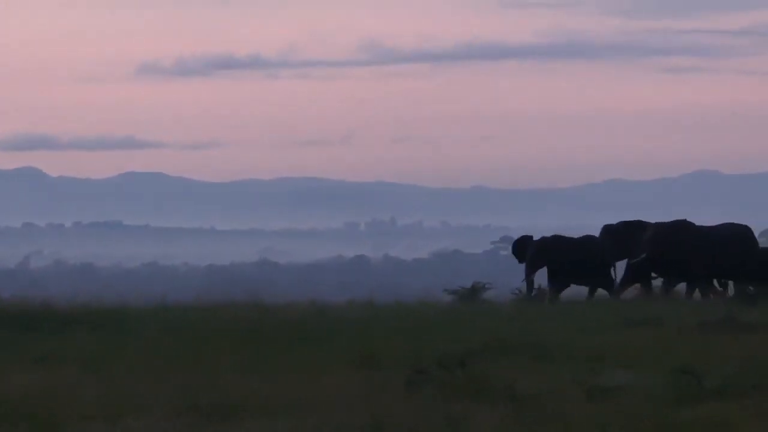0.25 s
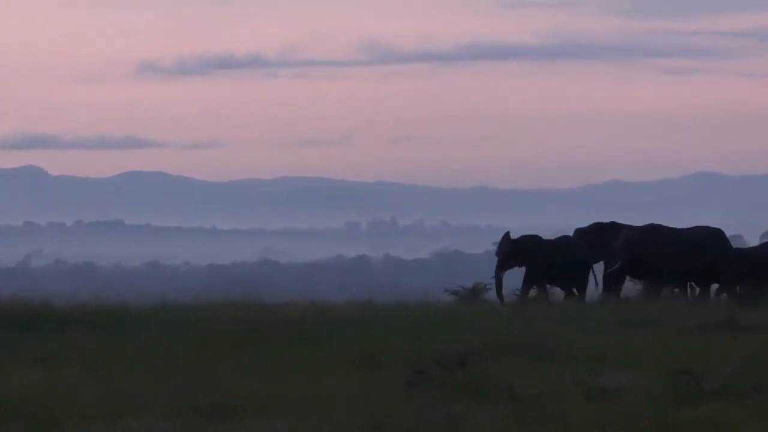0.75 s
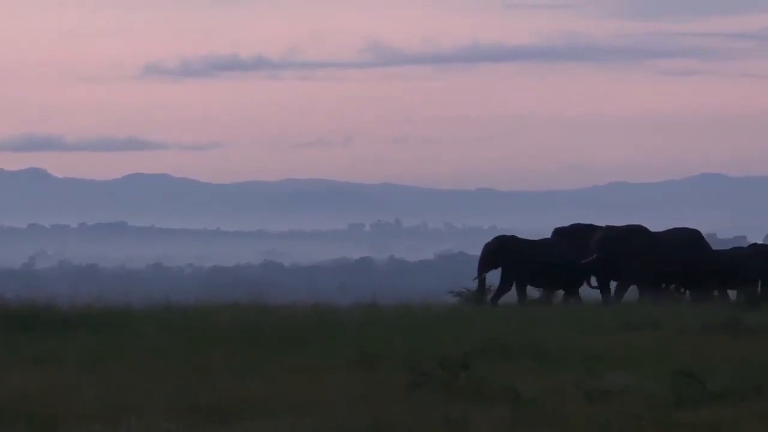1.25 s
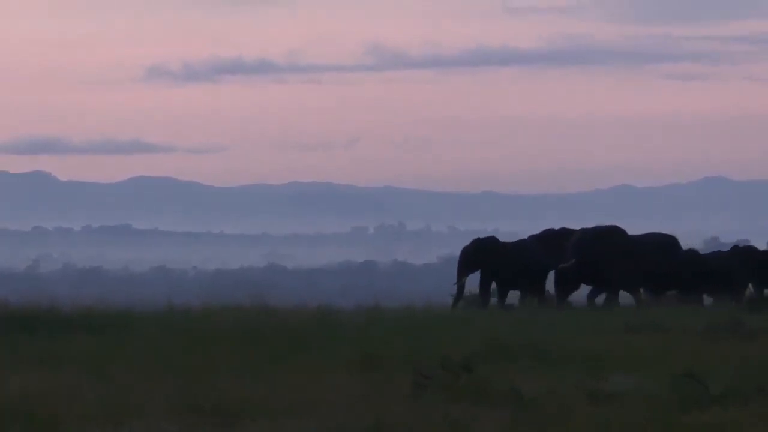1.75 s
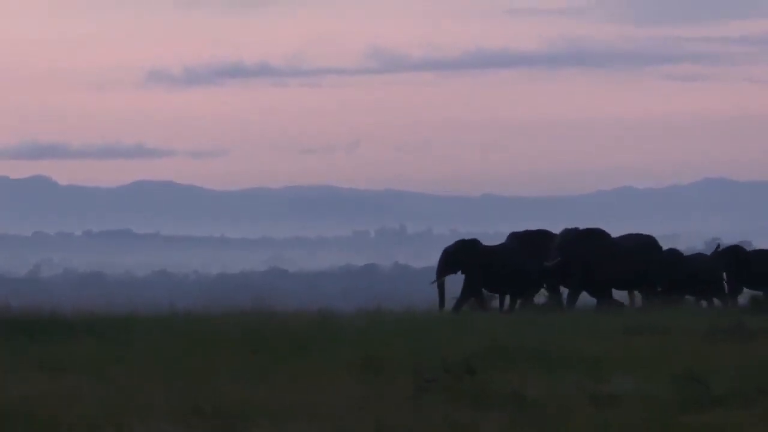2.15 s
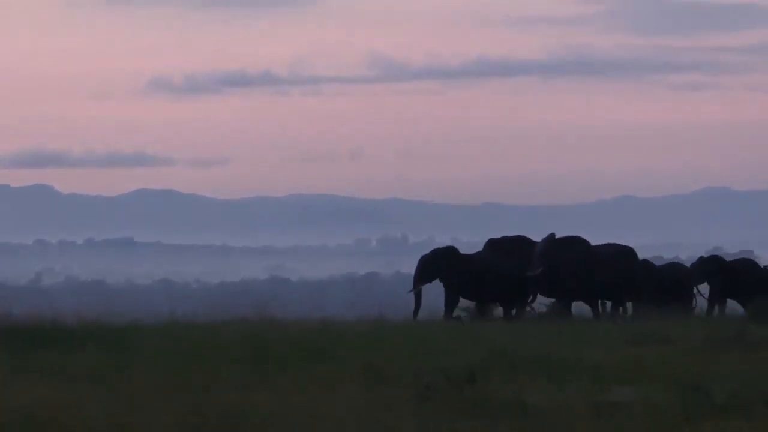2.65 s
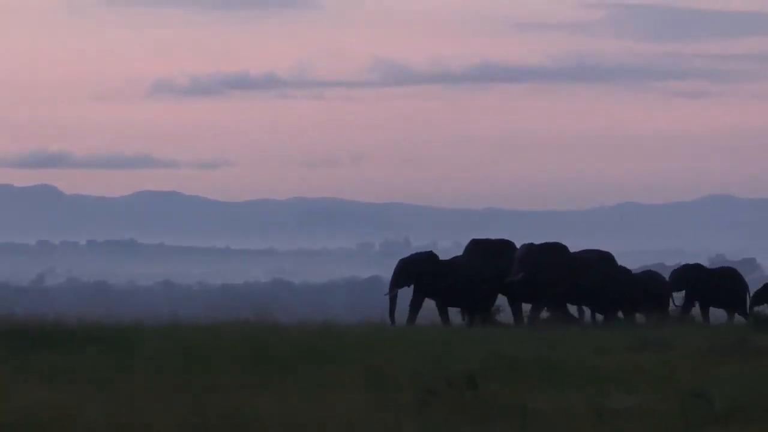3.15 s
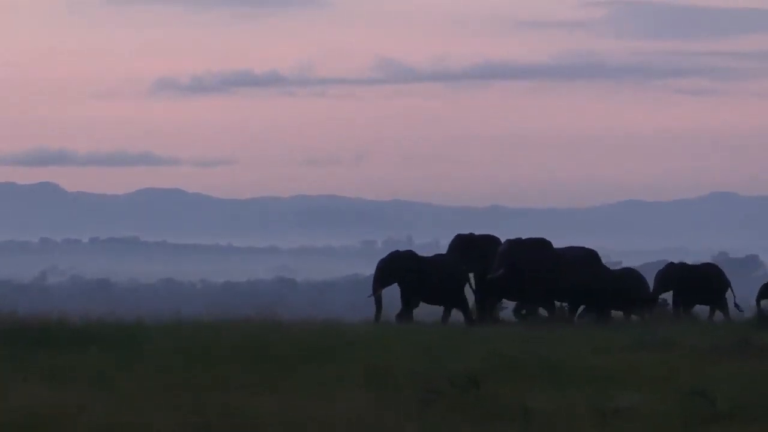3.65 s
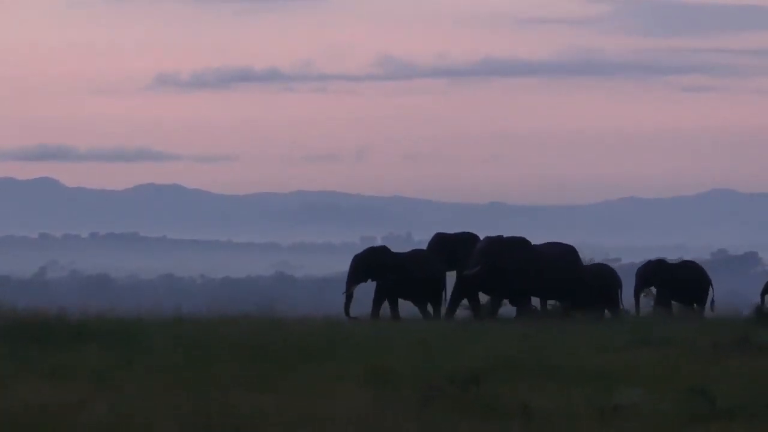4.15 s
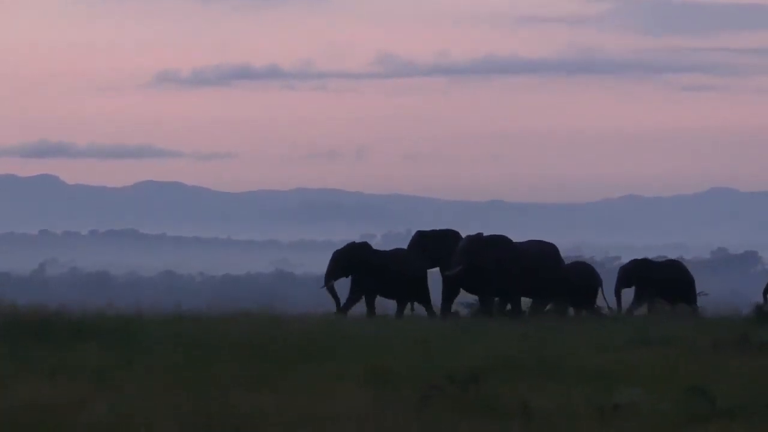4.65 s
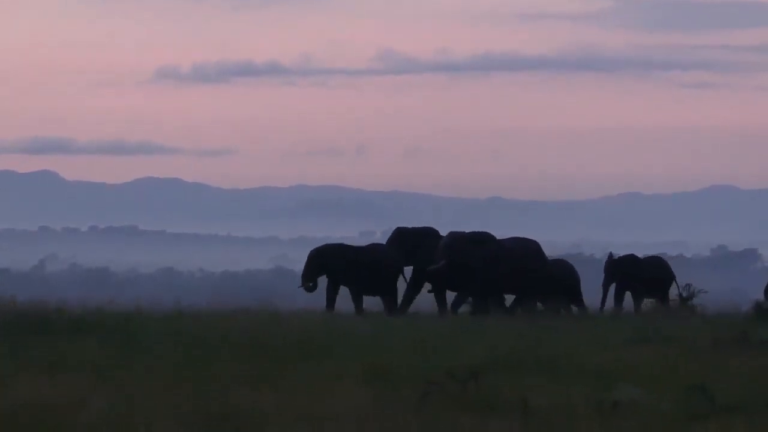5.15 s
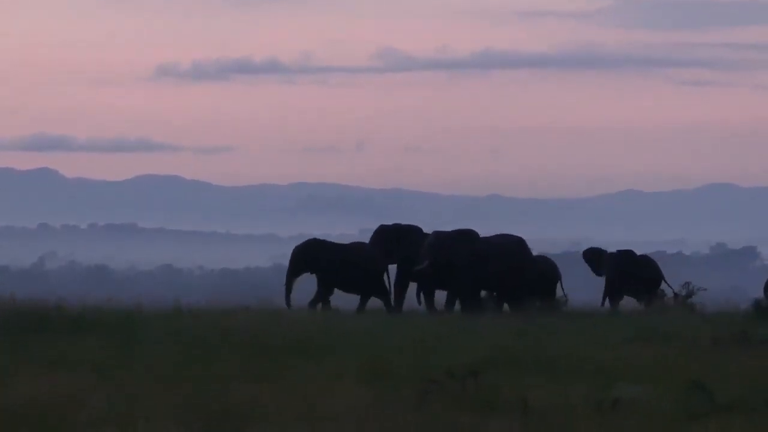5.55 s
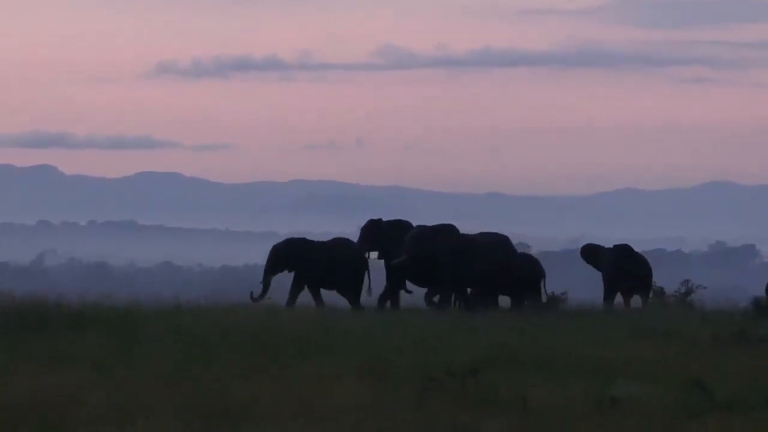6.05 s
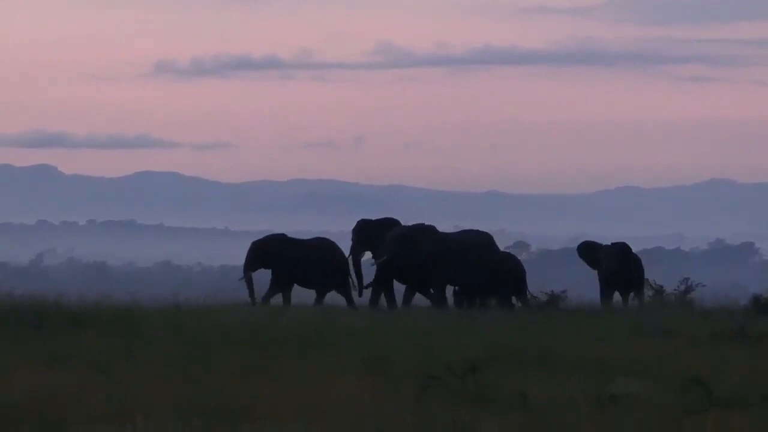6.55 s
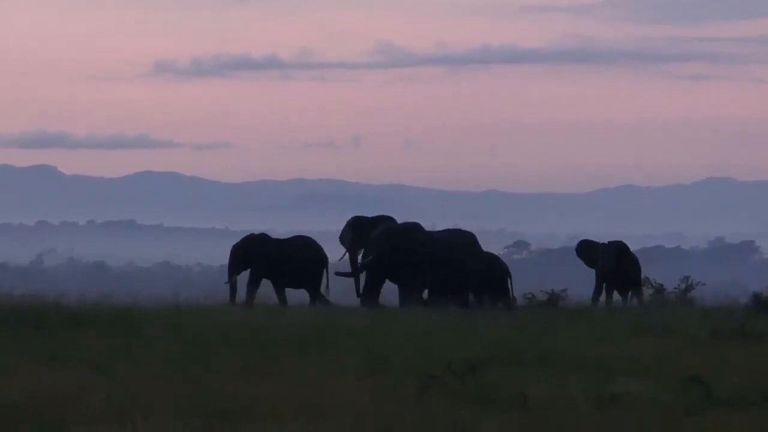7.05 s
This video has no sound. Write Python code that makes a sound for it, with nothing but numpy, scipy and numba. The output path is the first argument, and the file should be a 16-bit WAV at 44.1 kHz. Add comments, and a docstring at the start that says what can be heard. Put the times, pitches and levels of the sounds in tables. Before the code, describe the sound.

Outdoor stereo ambience on a wide plain: faint airy hiss, dense far-off birdsong and low wind buffeting on the microphone. After an opening two-note bird whistle and faint insect chirps, one elephant roars for just over a second, rough and throaty, swelling into a hoarse blare before dropping off. Quiet birds continue, grass hisses, wind bumps harder, the whistle returns, and a dry scrape with ticks sounds close by.

```python
"""Elephant roar across open grassland

An elephant, off to the right, gives one rough roar: a sputtering growl that opens into a blare and sinks.
Irregular vocal-fold pulses and gated breath drive resonances of the mouth and trunk.
A near bird twice whistles a falling note and a level one, as gliding sines; farther birds, a frog and
insects are bent sines, pulsed pips and noise. Breeze thumps on the microphone as short pressure swings;
hissing grass, a faint rumble, and one close scrape with two ticks are shaped from noise."""
import sys
import numpy as np
from scipy import signal
from scipy.fft import rfft, irfft
from scipy.io import wavfile
from scipy.ndimage import uniform_filter1d
from numba import njit

SR = 44100
rng = np.random.default_rng(int(sys.argv[2]) if len(sys.argv) > 2 else 0)


def generate_wav(signal):
    """Clip the signal to [-1, 1] and save it as 16-bit WAV at the path in sys.argv[1]."""
    frames = np.transpose(np.atleast_2d(signal))
    scaled = np.clip(frames, -1, 1) * 32767
    pcm = np.round(scaled).astype(np.int16)
    wavfile.write(sys.argv[1], SR, pcm)


N = 321489
T = np.arange(N) / SR  # time [s]
F = np.maximum(np.arange(N // 2 + 1) * SR / N, 1)  # spectrum bins [Hz]
TOP_HZ = 15600

# the plain's air: (frequency [Hz], relative level [dB])
PLAIN_COLOUR = [(25, -5), (76, -12.5), (250, 0.5), (370, -3), (480, 3), (680, -5.5), (1000, -3), (1300, -6),
                (2200, -5), (2700, -9), (3200, -12.5), (3900, -14.5), (7000, -26.5)]
PLAIN_DB = -55
# hiss of the grass: (frequency [Hz], relative level [dB])
GRASS_COLOUR = [(1500, -35), (3000, 3), (6000, 1.5), (7500, -2.5), (9300, 1.5), (12000, -3.5), (15500, -4)]
# swells of the grass: (time of the height [s], half length [s], level before the grass gain [dB])
GRASS_SWELLS = [(4.15, 0.29, -60), (4.85, 0.43, -60.5), (5.45, 0.15, -59), (6.35, 0.19, -65.5)]
STILL_GRASS_DB = -65.5  # between swells, before the grass gain
# a faint low rumble: (time of the height [s], half length [s], level [dB])
RUMBLE_SWELL = [(3.25, 0.13, -51)]
# its outline: (frequency [Hz], relative level [dB])
RUMBLE_COLOUR = [(120, -6), (155, 3), (235, -2.5), (320, -6), (450, -11)]

# puffs on the microphone: (time [s], peak [dB], frequency [Hz])
PUFFS = [(0.061,-27,304),(0.194,-28,164),(0.52,-29,129),(0.884,-39,118),(1.173,-37,123),(1.752,-30,104),(1.943,-27,122),(2.065,-30,123),(3.758,-34,130),
         (3.92,-35,226),(3.936,-31,151),(3.975,-28,136),(4.099,-23.5,140),(4.206,-34,190),(4.277,-31,188),(4.299,-34,120),(4.336,-21.5,162),(4.36,-22,224),(4.409,-24,164),(4.428,-25,172),
         (4.529,-13,272),(4.534,-21,247),(6.446,-34.5,96),(6.640,-33,123),(6.663,-32.5,108),(7.1,-27.5,157),(7.151,-33.5,145),(7.202,-38,136)]
# gusts that flutter on it: (time of the height [s], half length [s], level before the flutter gain [dB])
GUSTS = [(.2, 0.32, -48), (1.97, 0.24, -40.5), (3.98, 0.057, -40), (4.26, 0.22, -41.5), (4.47, 0.089, -36),
         (4.9, 0.16, -54), (6.56, 0.29, -48.5), (7.19, 0.11, -43.5)]
CALM_DB = -62.5  # the flutter between gusts, before the flutter gain

# distant chorus: (time [s], level of a call before distance smears it [dB])
CHORUS_LEVEL = [(0, -55.5), (1.1, -62), (2.8, -60.5), (4.0, -66), (5.2, -60), (5.8, -57.5), (7.29, -59.5)]
# short calls and pips, among them faint echoes of the near bird's whistle:
# (time [s], length [s], start [Hz], middle [Hz], end [Hz], level [dB])
SHORT_CALLS = [(0, 0.058, 3720, 3380, 2640, -56), (0.093, 0.031, 2580, 2730, 2790, -49),
               (0.345, 0.086, 3850, 4020, 3920, -62), (0.484, 0.075, 1497, 1606, 1480, -61.5),
               (0.836, 0.043, 2750, 2530, 2510, -56), (1.108, 0.11, 2690, 2860, 2940, -62),
               (1.36, 0.018, 3700, 4150, 4300, -50.5), (1.909, 0.015, 3850, 4220, 4330, -49),
               (2.142, 0.018, 3880, 4270, 4310, -51), (2.407, 0.076, 3600, 3420, 3050, -63),
               (2.68, 0.062, 2210, 2550, 3146, -58.5), (2.775, 0.016, 4670, 4370, 3810, -59),
               (2.812, 0.033, 2710, 2450, 2170, -60), (3.03, 0.079, 3300, 3440, 3630, -68),
               (3.125, 0.042, 2150, 2170, 2420, -62), (3.183, 0.08, 2050, 2320, 3000, -56),
               (3.26, .13, 1800, 1870, 1770, -64.5), (3.324, 0.1, 2650, 2996, 2820, -58.5),
               (3.467, 0.11, 2600, 3040, 2980, -67.5), (3.52, 0.077, 2120, 2285, 2240, -63),
               (3.733, 0.13, 2750, 3000, 3030, -66), (3.883, 0.055, 2290, 2736, 2880, -53),
               (4.01, 0.032, 2240, 2330, 2320, -64), (4.33, 0.06, 1720, 2080, 2540, -56.5),
               (4.552, 0.024, 2610, 2820, 2800, -51.5), (4.598, 0.13, 3900, 4010, 3910, -58),
               (5.508, 0.049, 3700, 3580, 3630, -59), (5.561, 0.02, 3460, 3040, 3090, -49),
               (5.623, 0.127, 3620, 4020, 3940, -62.5), (5.685, 0.078, 3450, 3550, 3440, -60),
               (5.745, 0.037, 2660, 2540, 2480, -54), (5.852, 0.062, 2330, 2700, 3010, -53),
               (5.926, 0.043, 3300, 3190, 2880, -57), (5.973, 0.082, 1875, 2365, 2743, -52),
               (6.036, 0.033, 2585, 2645, 2570, -50.5), (6.15, 0.05, 3190, 3300, 3520, -63),
               (6.338, 0.047, 2690, 2250, 2010, -50), (6.414, .04, 3720, 3680, 3850, -58.5),
               (6.536, 0.022, 2670, 2600, 2520, -51), (6.669, 0.072, 1767, 1690, 1510, -58),
               (6.751, 0.095, 2840, 2474, 2400, -53.5), (6.974, 0.052, 3600, 3570, 3880, -59.5),
               (6.981, 0.066, 1640, 1580, 1480, -61), (7.057, .04, 3850, 3550, 3250, -63),
               (7.042, 0.054, 1970, 2420, 3090, -57), (7.168, 0.059, 2540, 2770, 3340, -59)]
# a farther bird's falling whistles:
# (time [s], length [s], start [Hz], end [Hz], bend of the slide [0-4], level [dB])
FAR_WHISTLES = [(2.89, .17, 4010, 3030, 3.3, -54), (5.721, .38, 3570, 2754, 1.7, -51)]

# a frog's runs of buzzing pips: (time [s], length of the run [s], level [dB])
FROG_RUNS = [(2.129, .83, -55.5), (4.915, .1, -45.5)]
# a cricket's runs of chirps: (time [s], length of the run [s], level [dB])
CRICKET_RUNS = [(.022, .1, -61), (.42, 0.15, -62), (.745, 0.15, -66.5)]
FROG_PERIOD_S, CRICKET_PERIOD_S = .066, .04
# another insect's single whirr: (time of the height [s], half length [s], level [dB])
WHIRR = [(.98, 0.034, -55)]
# its outline: (frequency [Hz], relative level [dB])
WHIRR_COLOUR = [(3400, -4), (4500, -4), (4950, -2), (5500, -18)]

# strokes of the scrape: (time of the height [s], half length [s], level before the scrape gain [dB])
STROKES = [(5.356, 0.0058, -38.5), (5.379, .007, -46), (5.41, 0.065, -45), (5.423, 0.025, -37),
           (5.464, 0.0065, -44)]
# its outline: (frequency [Hz], relative level [dB])
SCRAPE_COLOUR = [(700, -26), (1200, -7), (1600, 7.5), (2000, -1), (2600, 6), (3300, -4), (4100, 5),
                 (5200, -0.5), (6300, -0.5), (7500, -15.5), (15000, -20)]
# dry ticks close by: (time [s], level [dB])
TICKS = [(5, -45), (5.489, -43.5)]
GRAIN_DB = 3  # spread of the scrape's grain sizes

# the near bird's songs: (fall's time [s], fall level [dB], held note's time [s], hold level [dB])
SONGS = [(0.04, -38, 0.3817, -36.5), (4.444, -38, 4.791, -39.5)]
# the fall: a quick drop between two pitches, on top of a steady downward slide
FALL_FROM_HZ, FALL_TO_HZ, FALL_S = 4974, 3780, 0.2334
FALL_GLIDE_S, FALL_SAG_HZ_PER_S = 0.078, 2920
THROB_PERIOD_S, THROB_DB, THROB_FIRST_S = 0.0874, 3, 0.028  # the fall swells three times
FALL_ONSET_DB, FALL_ONSET_S = -2, 0.027  # it starts softly
# the held note settles, climbs, and lifts at its end
HOLD_HZ, CLIMB_HZ, HOLD_S, HOLD_EDGE_S = 2915, 165, 0.2155, .016
SCOOP_HZ, SCOOP_S, LIFT_HZ, LIFT_S = 153, 0.028, 99, 0.0132
DIP_AT_S, DIP_HALF_S, DIP_DB = 0.077, 0.053, -4.5  # it weakens about where it is lowest

# the roar's stages, in order growl, opening, weaker blare, held blare, last push:
# (time [s], period scatter [0-1], breath share [ratio], mouth ring [Hz], blare ring [Hz], open mouth [dB])
STAGES = [(1.22, 0.28, 0.26, 1074, 2000, -37), (1.6, 0.09, 0.1, 1004, 1893, -30),
          (1.78, 0.06, 0.13, 1020, 1810, -35), (1.969, .05, 0.15, 916, 2030, -31),
          (2.141, 0.16, 0.15, 976, 1738, -28)]
# vocal folds: (time [s], pulse rate [Hz], level of the clear overtones [dB])
VOICE = [(1.22, 105, -62), (1.5, 160, -47), (1.62, 204.1, -36.5), (1.72, 202.2, -30.5),
         (1.82, 204.7, -30.5), (1.87, 207.4, -32.5), (1.93, 198.9, -33.5), (2.01, 192.1, -27.5),
         (2.09, 194.2, -28.5), (2.16, 189, -35.5), (2.25, 187.1, -29), (2.33, 186.1, -38),
         (2.4, 184.1, -48), (2.47, 181.3, -72)]
# outline of the clear overtones: (frequency [Hz], relative level [dB])
VOICE_COLOUR = [(480, -10), (580, -9), (680, -2), (780, -7), (890, 1), (1000, -1), (1130, 1), (1240, -6),
                (1400, -17)]
SHIMMER_DB, LIMP = 3.5, .15  # pulses differ in size, and pair long-short (share of a period)
# jolts as the throat catches: (time [s], strength [dB])
JOLTS = [(1.22, 10), (1.260, 13), (1.342, 22.5), (1.356, 17.5), (1.379, 10), (1.496, 12.5), (1.529, 14),
         (1.557, 13), (2.315, 10)]
CATCH_DB, CATCH_S = -8, .011  # the level dips ahead of each jolt
# resonances of mouth and trunk, low to high: (frequency [Hz], width [Hz], relative level [dB])
MOUTH_MODES = [(513, 75, 1.5), (667, 53, 5), (840, 180, 0.5), (1015, 146, 3.5), (1107, 120, 2.5),
               (1286, 133, -3.5)]
BLARE_MODES = [(1545, 100, 3), (1716, 58, 7), (1850, 98, -1.5), (1950, 100, -3), (2300, 110, 0.5)]
RASP_MODES = [(2750, 160, 7.5), (3125, 120, 3.5), (3274, 89, 4.5), (3750, 116, 4), (3924, 230, 1),
              (5000, 660, -3.5)]
BLARE_BREATH, RASP_BREATH = .3, .3  # extra breath in the upper bands
# the blare's strength: (time [s], level before the blare gain [dB])
BLARE_LEVEL = [(1.17, -63), (1.289, -58.5), (1.796, -51), (1.88, -41), (1.935, -48), (1.97, -41),
               (2.04, -46), (2.095, -57), (2.14, -43), (2.255, -32), (2.354, -49), (2.5, -72)]
# the rasp climbs as the trunk tightens: (time [s], ring [Hz], level [dB])
RASP_PATH = [(1.2, 3050, -59.5), (1.45, 3060, -57.5), (1.6, 3170, -54), (1.68, 3160, -50),
             (1.78, 3300, -54.5), (1.86, 3520, -46), (1.94, 3560, -52), (2.05, 3700, -51.5),
             (2.1, 3270, -51), (2.16, 3540, -45), (2.23, 3700, -42.5), (2.3, 3770, -48.5),
             (2.35, 3102, -59), (2.48, 2900, -73)]
# the trunk's deep ring, which starts first and dies last: (time [s], ring [Hz], level [dB])
DEEP_PATH = [(1.1, 252, -79), (1.18, 263, -41.5), (1.3, 270, -36), (1.5, 279, -34), (1.56, 242, -34),
             (1.7, 280, -46.5), (1.83, 290, -37), (1.89, 263, -42), (2.05, 314, -46), (2.16, 272.1, -35),
             (2.3, 266, -26.5), (2.42, 256, -35.5), (2.56, 254, -57), (2.75, 250, -100)]
ROAR_END_S = 2.314  # the push stops
MOUTH_ATTACK_DB_PER_S, MOUTH_RELEASE_DB_PER_S = 1505, 168
CLOSING_S, CLOSING_HZ_PER_S, CLOSED_HZ = 2.29, 8100, 618  # the mouth closes and its ring sinks


def undb(db):
    """Decibels to gain."""
    return 10 ** (np.asarray(db) / 20)


def unit(x):
    """Scale to rms 1."""
    return x / np.sqrt(np.mean(x ** 2))


def curves(rows):
    """Each column of a table, joined by straight lines in time."""
    s, *columns = np.transpose(rows)
    return [np.interp(T, s, column) for column in columns]


def swells(rows):
    """Gain of smooth rises and falls whose powers add."""
    return np.sqrt(sum(undb(db) ** 2 * np.exp(-2 * ((T - s) / half) ** 2) for s, half, db in rows))


def walk(rate):
    """Smooth chance with a spread near 1, renewed about rate times a second."""
    k = max(int(SR / rate), 1)
    steps = rng.standard_normal(N)[np.arange(N) // k]
    return 1.79 * uniform_filter1d(uniform_filter1d(steps, k), k)


def sine(hz):
    """Sine of rms 1 that follows a moving pitch."""
    return np.sqrt(2) * np.sin(2 * np.pi * np.cumsum(hz) / SR)


def noise_pair(width):
    """Stereo noise: a part common to both sides plus a separate part on each."""
    return rng.standard_normal(N) + width * rng.standard_normal((2, N))


def pan(db):
    """Left and right gains for a level difference; positive leans left."""
    gains = undb(np.array([np.atleast_1d(db), -np.atleast_1d(db)]) / 2)
    return gains / gains.mean(axis=0)


def add(out, s, x):
    """Mix a short sound in at time s."""
    i = max(int(s * SR), 0)
    out[:, i:i + x.shape[-1]] += x[..., :max(N - i, 0)]


def colour(x, points):
    """Filter by a (frequency [Hz], level [dB]) outline that falls away beyond its ends; rms 1."""
    hz, db = np.transpose(points)
    skirts = (1 + (hz[0] / 1.3 / F) ** 6) * (1 + (F / 1.3 / hz[-1]) ** 10)
    gain = undb(np.interp(np.log(F), np.log(hz), db)) / np.sqrt(skirts)
    return unit(irfft(rfft(x) * gain, N))


def echoes(x, t60, delay):
    """Diffuse scatter from ground and bushes, different at each ear; fading 60 dB in t60 seconds."""
    t = np.arange(SR) / SR
    tail = rng.standard_normal((2, SR)) * undb(-60 * t / t60) * (t > delay)
    tail /= np.sqrt(np.sum(tail ** 2, axis=1, keepdims=True))
    return signal.fftconvolve(x, tail, axes=1)[:, :N]


def chirp(length, start, middle, end, softness=0.3):
    """A whistle bending through three pitches."""
    u = np.linspace(0, 1, int(length * SR))
    hz = np.polyval(np.polyfit([0, .5, 1], [start, middle, end], 2), u)
    return sine(hz) * np.abs(np.sin(np.pi * u)) ** softness


def plain(grass_db=5.0):
    """Distant air and insects as coloured noise, with grass hissing as the breeze passes."""
    air = colour(noise_pair(1.0), PLAIN_COLOUR)
    grass = colour(noise_pair(1.0), GRASS_COLOUR)
    air = air * undb(PLAIN_DB + 0.62 * walk(12)) * pan(2.3)
    return air + grass * np.hypot(swells(GRASS_SWELLS), undb(STILL_GRASS_DB)) * undb(grass_db)


def rumble():
    """A dull, far-off rumble after the roar: low noise that swells once, to the left."""
    return colour(rng.standard_normal(N), RUMBLE_COLOUR) * swells(RUMBLE_SWELL) * pan(9.8)


def bird_chorus(count=700, centre_hz=2450):
    """A dense chorus of short calls, scattered at random and smeared by distance."""
    chorus = np.zeros((2, N))
    times = rng.uniform(0, T[-1], count)
    chances = np.clip(rng.standard_normal((count, 6)), -2, 2)
    for s, (pitch, slide, bend, size, side, length) in zip(times, chances):
        hz = centre_hz * np.exp(.24 * pitch)
        start, middle, end = hz * np.exp([-.08 * slide, 0.04 * bend, 0.079 * slide])
        call = chirp(.055 * np.exp(0.252 * length), start, middle, end)
        # pitches far from the centre are weaker
        add(chorus, s, call * undb(1.5 * size - 1.8 * pitch ** 2) * pan(2 + 2 * side))
    chorus = chorus * undb(curves(CHORUS_LEVEL)[0])
    # the farthest birds arrive partly scattered
    return .52 * chorus + .38 * echoes(chorus, .4, .005)


def short_calls(flutter_db=2.0, echo_db=-3):
    """Short calls and pips, among them faint echoes of the near bird's whistle: bent, fluttering sines."""
    calls = np.zeros((2, N))
    for s, length, start, middle, end, db in SHORT_CALLS:
        add(calls, s, chirp(length, start, middle, end) * undb(db))
    calls = calls * undb(flutter_db * walk(90))
    return calls + undb(echo_db) * echoes(calls, 0.25, 0.0044)


def far_whistler(peak_share=0.33, echo_db=-13):
    """A smooth whistle that slides down ever more slowly, swells early and lingers as it fades."""
    out = np.zeros((2, N))
    for s, length, start, end, bend, db in FAR_WHISTLES:
        u = np.linspace(0, 1, int(length * SR))
        hz = start + (end - start) * np.expm1(-bend * u) / np.expm1(-bend)
        swell = u / peak_share * np.exp(1 - u / peak_share) * np.minimum(10 * (1 - u), 1)
        add(out, s, sine(hz) * swell * undb(db))
    return out + undb(echo_db) * echoes(out, 0.26, .02)


def trill(runs, hz, length, period_s, buzz_hz, depth, side_db, droop, scatter_db=0.6):
    """Runs of evenly spaced pips, each a quick train of pulses whose pitch droops a little."""
    out = np.zeros((2, N))
    tone = chirp(length, hz * (1 + droop), hz, hz * (1 - droop), softness=0.88)
    pip = unit(tone * (1 + depth * np.cos(2 * np.pi * buzz_hz * np.arange(len(tone)) / SR)))
    for start, run_s, db in runs:
        for s in np.arange(start, start + run_s, period_s):
            add(out, s, pip * undb(db) * pan(side_db))
    out = out * undb(scatter_db * walk(18))
    return out + undb(-22) * echoes(out, 0.28, 0.0033)


def frog():
    """Runs of drooping, lightly buzzing pips to the left."""
    return trill(FROG_RUNS, hz=2685, length=0.034, period_s=FROG_PERIOD_S, buzz_hz=214,
                 depth=0.16, side_db=7, droop=0.021)


def cricket():
    """Runs of high, more deeply pulsed chirps to the right."""
    return trill(CRICKET_RUNS, hz=4910, length=0.036, period_s=CRICKET_PERIOD_S, buzz_hz=90.5,
                 depth=0.45, side_db=-4.5, droop=0.014)


def insect(pulse_hz=55, depth=0.52):
    """A short, dry whirr: a narrow band of noise pulsed by the wings."""
    wings = 1 + depth * np.cos(2 * np.pi * pulse_hz * T)
    return colour(rng.standard_normal(N), WHIRR_COLOUR) * swells(WHIRR) * wings


def breeze(cycles=0.5, flutter_db=-3.0, lean_db=6, eddy_db=3.0):
    """Each eddy is one short pressure swing, the quick ones at the left port; a low flutter lies between."""
    puffs, t = np.zeros((2, N)), np.arange(-SR // 32, SR // 32) / SR
    turns = rng.uniform(0, 2 * np.pi, (len(PUFFS), 2))
    for (s, db, hz), turn in zip(PUFFS, turns):
        phase = turn[0] + np.array([[0], [.8]]) * np.sin(turn[1])  # the two ports differ a little
        swing = np.cos(2 * np.pi * hz * t + phase) / np.cosh(np.pi / 2 * t * hz / cycles)
        add(puffs, s + t[0], swing * undb(db) * pan(lean_db * np.log2(hz / 150)))
    # the microphone does not pass the slowest swings
    puffs = irfft(rfft(puffs) / (1 + (44 / F) ** 4), N)
    flutter = colour(noise_pair(1.0), [(30, -43), (60, -6.5), (100, 0.5), (160, -4.0),
                                       (240, -13.0), (350, -22.0), (500, -32.0)])
    wind = np.hypot(swells(GUSTS), undb(CALM_DB)) * undb(flutter_db + eddy_db * walk(35))
    return puffs + flutter * wind


def scrape(gain_db=-1, tick_s=0.0067):
    """Dense stick-slip grains in a few strokes close by, and brighter dry ticks."""
    grains = noise_pair(0.72) * undb(GRAIN_DB * np.clip(walk(700), -2, 1.5))
    rub = colour(grains, SCRAPE_COLOUR) * swells(STROKES) * undb(gain_db)
    bright = colour(grains, [(1300, -14), (4000, -9.5), (9000, -20.5), (15000, -25)])
    return rub + bright * sum(undb(db) * np.exp(-((T - s) / tick_s) ** 2) for s, db in TICKS)


def near_whistler(waver=0.0012, flutter_db=2.0, echo_db=-22, fall_edge_s=0.018):
    """A pure whistle that slides down, then a level note with a small lift at its end."""
    out, wobble, flutter = 0, 1 + waver * walk(120), flutter_db * walk(160)

    def note(t, length, edge_s, hz, db):
        """A sine that opens and closes softly."""
        opening = np.clip(np.minimum(t, length - t) / edge_s + .5, 0, 1) ** 2
        return sine(hz * wobble) * undb(db + flutter) * opening

    for fall_s, fall_db, hold_s, hold_db in SONGS:
        t = np.clip(T - fall_s, -fall_edge_s, 1)
        hz = FALL_TO_HZ + (FALL_FROM_HZ - FALL_TO_HZ) * np.exp(-t / FALL_GLIDE_S)
        hz = hz - FALL_SAG_HZ_PER_S * t
        throb = THROB_DB * np.cos(2 * np.pi * (t - THROB_FIRST_S) / THROB_PERIOD_S)
        onset = FALL_ONSET_DB * np.exp(-np.maximum(t, 0) / FALL_ONSET_S)
        fall = note(t - fall_edge_s / 2, FALL_S, fall_edge_s, hz, fall_db + throb + onset)

        t = np.clip(T - hold_s, -HOLD_EDGE_S, 1)
        hz = HOLD_HZ + SCOOP_HZ * np.exp(-t / SCOOP_S) + CLIMB_HZ * (t / HOLD_S) ** 2
        hz = hz + LIFT_HZ * np.exp(-((t - HOLD_S + LIFT_S) / LIFT_S) ** 2)
        dip = DIP_DB * np.exp(-((t - DIP_AT_S) / DIP_HALF_S) ** 2)
        hold = note(t, HOLD_S, HOLD_EDGE_S, hz, hold_db + dip)
        out = out + fall * pan(-4.5) + hold * pan(-9.5)
    return out + undb(echo_db) * echoes(out, 0.48, 0.01)


def stages(glide_s):
    """The roar's controls, easing from each stage into the next."""
    rows = np.array(STAGES, float)
    ease = (1 + np.tanh((T - rows[1:, :1]) / glide_s)) / 2
    return rows[0, 1:, None] + np.diff(rows[:, 1:], axis=0).T @ ease


def fade_db(start, end):
    """Steep rise before start, hold, slower release after end."""
    rise = MOUTH_ATTACK_DB_PER_S * np.maximum(start - T, 0)
    release = MOUTH_RELEASE_DB_PER_S * np.maximum(T - end, 0)
    return -np.minimum(rise + release, 200)


def steady(x, span=0.073):
    """Hold a rough sound at rms 1 over spans longer than its grain."""
    power = uniform_filter1d(uniform_filter1d(x ** 2, int(span * SR)), int(span * SR / 2))
    return x / np.sqrt(np.abs(power) + 1e-12)


@njit
def folds(hz, scatter, chance, size, stretch):
    """One pulse a cycle, each with its own length and size; also the phase."""
    pulses, phase, p, k = np.zeros(len(hz) + 1), np.empty(len(hz)), 0., 0
    for i in range(len(hz)):
        step = hz[i] * np.exp(scatter[i] * chance[k]) / stretch[k] / SR
        p += step
        if p >= 1:
            p, k = p - 1, k + 1
            # share the pulse between two samples to place it exactly
            pulses[i] += size[k] * p / step
            pulses[i + 1] += size[k] * (1 - p / step)
        phase[i] = p
    return pulses[:-1], phase


def throat(hz, puff_cycles=0.71, glide_s=.04):
    """Chaotic vocal folds, with breath noise strongest just after each pulse."""
    scatter, breath = stages(glide_s)[:2]
    chance = rng.standard_normal((N // 50, 2)).T
    sizes = undb(SHIMMER_DB * np.tanh(chance[1]))
    stretch = 1 + LIMP * (-1.) ** np.arange(N // 50)
    pulses, phase = folds(hz * np.exp(.02 * walk(12)), scatter, chance[0].copy(), sizes, stretch)
    air = unit(np.exp(-phase / puff_cycles) * rng.standard_normal(N))
    return unit(pulses) + breath * air, air


def catches(source, jolt_s=0.0027, kick=10.6):
    """The throat catches for a moment, then lets go with one hard pulse; also the jolting gain."""
    jolts = np.ones(N)
    for s, db in JOLTS:
        source *= 1 - .9 * np.exp(-((T - s + jolt_s) / jolt_s) ** 2)
        source[int(s * SR)] += kick
        jolts *= undb(CATCH_DB * (T < s) * np.exp(-np.abs(T - s) / CATCH_S))
        jolts += (undb(db) - 1) * (T > s) * np.exp(-np.abs(T - s) / jolt_s)
    return source, uniform_filter1d(jolts, SR // 1000)


def clear_voice(hz, flutter_db=2.0, waver=0.00603):
    """Folds locked in a regular long-short swing: clean overtones of half the pulse rate stand out."""
    phase = np.pi * np.cumsum(hz * np.exp(waver * walk(45.13))) / SR
    at_hz, outline_db = np.transpose(VOICE_COLOUR)
    total = 0
    for k in range(5, 15):
        db = np.interp(k * hz / 2, at_hz, outline_db) + flutter_db * walk(22.09)
        total = total + np.sin(k * phase + rng.uniform(0, 2 * np.pi)) * undb(db)
    return total


def resonate(x, modes, lo_hz, hi_hz):
    """Parallel resonances of alternating sign within a steep pass band."""
    response = 0
    for k, (hz, width, db) in enumerate(modes):
        response = response + (-1) ** k * undb(db) / (1 + 1j * (F / hz - hz / F) * hz / width)
    band = signal.butter(4, [lo_hz, hi_hz], "band", fs=SR, output="sos")
    return signal.sosfilt(band, irfft(rfft(x) * response, N))


@njit
def ring(x, hz, width):
    """Band-pass with a moving centre."""
    y, band, low = np.empty(len(x)), 0., 0.
    for i in range(len(x)):
        g, k = np.tan(np.pi * hz[i] / SR), width / hz[i]
        v = (band + g * (x[i] - low)) / (1 + g * (g + k))
        band, low, y[i] = 2 * v - band, low + 2 * g * v, k * v
    return y


def formant(x, hz, width, drift, tremble_ms=0.322, sputter_db=1.0):
    """One broad resonance following the tract; the trembling trunk bends every ring and makes it sputter."""
    x = np.interp(T + tremble_ms / 1000 * walk(11), T, x)
    return ring(x, hz * np.exp(drift * walk(35.03)), float(width)) * undb(sputter_db * walk(110))


def elephant(blare_db=2.5, patchy_db=1.5, lag_ms=0.019, near_db=-8, far_db=-22):
    """Vocal folds and gated breath ring the trunk and the opening mouth."""
    (hz, clear_db), (deep_hz, deep_db) = curves(VOICE), curves(DEEP_PATH)
    source, air = throat(hz)
    source, jolts = catches(source)
    start = STAGES[0][0]
    mouth_hz, blare_hz = stages(glide_s=0.027)[2:4]
    mouth_hz = np.maximum(mouth_hz - CLOSING_HZ_PER_S * np.maximum(T - CLOSING_S, 0), CLOSED_HZ)
    mouth_db = stages(glide_s=0.082)[4] + fade_db(start, ROAR_END_S)
    rasp_hz, rasp_db = curves(RASP_PATH)

    mouth = formant(resonate(source, MOUTH_MODES, 400, 2030), mouth_hz, width=334, drift=0.064)
    overtones = steady(clear_voice(hz)) * undb(clear_db) * (T > start) * (T < VOICE[-1][0])
    mouth = (steady(mouth, 0.068) * undb(mouth_db) + overtones) * pan(-5.5)

    blare = resonate(source + BLARE_BREATH * air, BLARE_MODES, 1370, 2260)
    blare = formant(blare, blare_hz, width=220, drift=0.038)
    # the trunk also sings a wavering tone at its ring
    tone = np.sin(2 * np.pi * np.cumsum(blare_hz * np.exp(.012 * walk(45))) / SR) * undb(3.3 * walk(39.93))
    blare = steady(steady(blare) + tone) * undb(curves(BLARE_LEVEL)[0] + blare_db) * pan(-5.5)

    rasp = resonate(source + RASP_BREATH * air, RASP_MODES, 2230, 5700)
    rasp = formant(rasp, rasp_hz, width=390, drift=0.015)
    rasp = steady(rasp) * undb(rasp_db + patchy_db * walk(34.89)) * pan(-5.0)

    # the deep ring: two resonances in a row
    trunk = ring(source + 0.8 * air, deep_hz * np.exp(0.018 * walk(40)), 33.0)
    trunk = ring(trunk + 0.054 * source, deep_hz, 186.0)
    trunk = steady(trunk, 0.062) * undb(deep_db) * (T > DEEP_PATH[0][0]) * pan(3.8)

    sounding = undb(fade_db(start, BLARE_LEVEL[-1][0]))
    roar = (mouth + (blare + rasp) * sounding) * jolts
    # the animal stands to the right, so the left ear hears it later
    roar = np.array([np.interp(T - lag_ms / 1000, T, roar[0]), roar[1]])
    # nearby bushes scatter the short waves; the deep ring passes them by
    roar = roar + undb(near_db) * echoes(roar, 0.1, 0.0027)
    roar = roar + trunk * np.sqrt(uniform_filter1d(jolts, SR // 100))
    return roar + undb(far_db) * echoes(roar, 0.92, 0.056)


def scene():
    """Everything on the plain, from the background to the elephant."""
    background = plain() + rumble() + bird_chorus() + short_calls() + far_whistler()
    small_animals = frog() + cricket() + insect()
    close_by = breeze() + scrape() + near_whistler()
    return background + small_animals + close_by + elephant()


def record(dry):
    return signal.sosfilt(signal.ellip(10, .2, 80, TOP_HZ, fs=SR, output="sos"), dry)


dry = scene()
out = record(dry)
generate_wav(out)
```